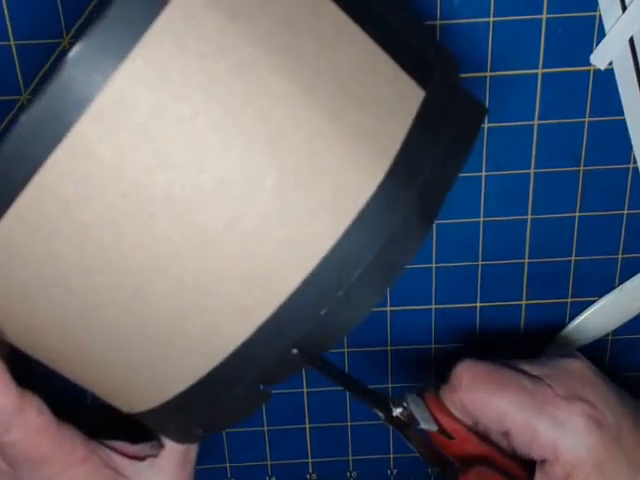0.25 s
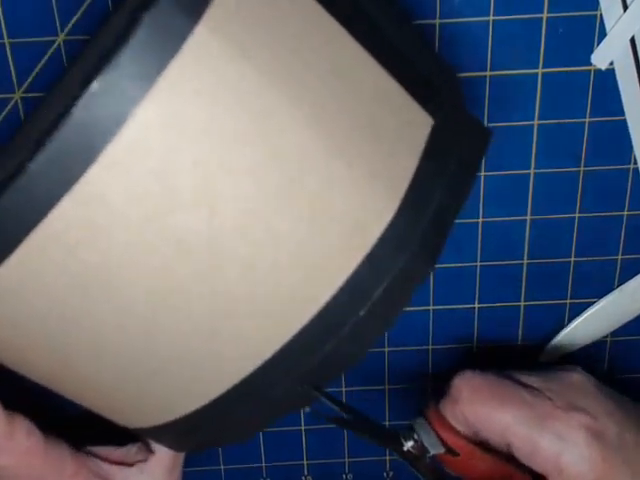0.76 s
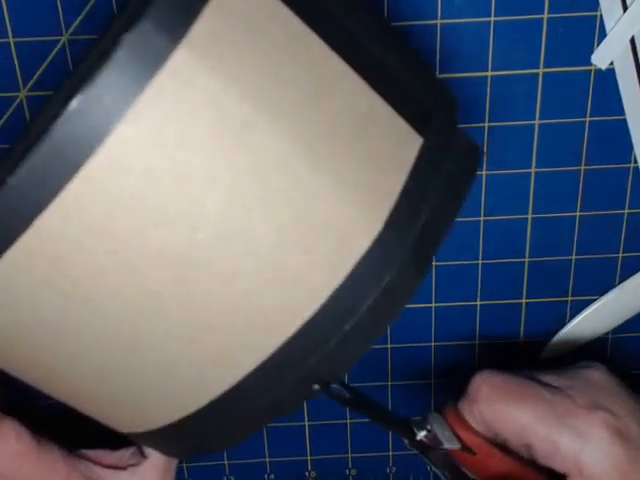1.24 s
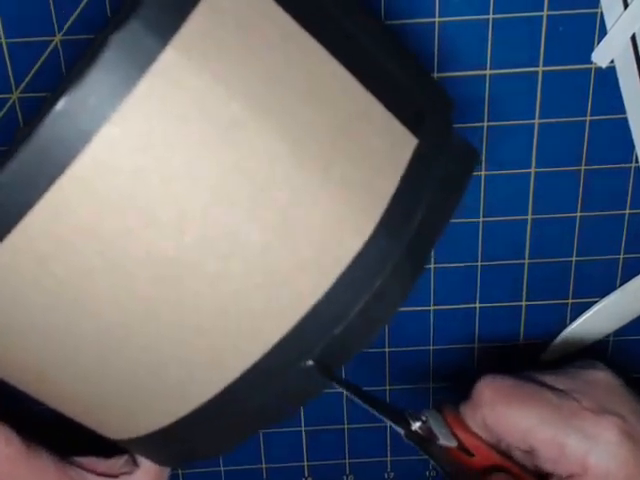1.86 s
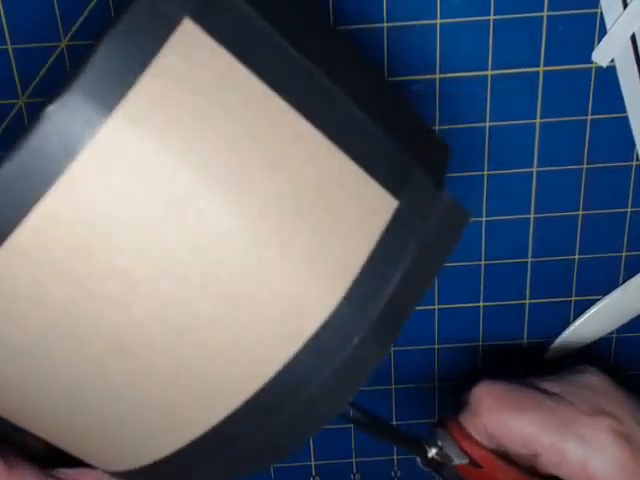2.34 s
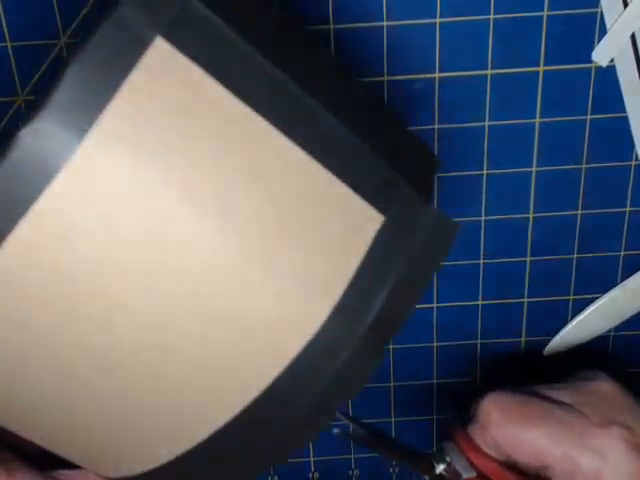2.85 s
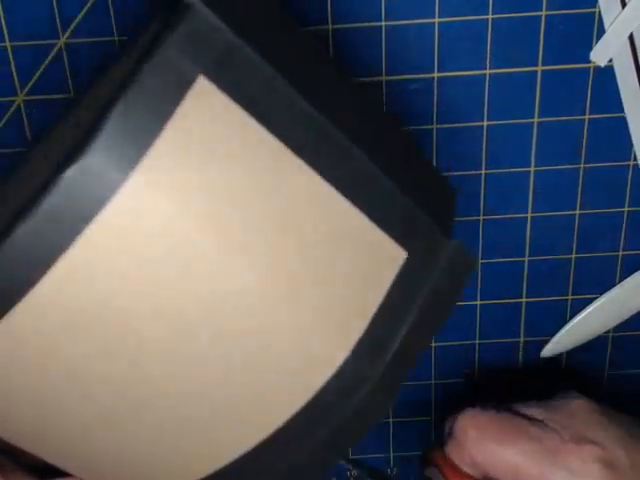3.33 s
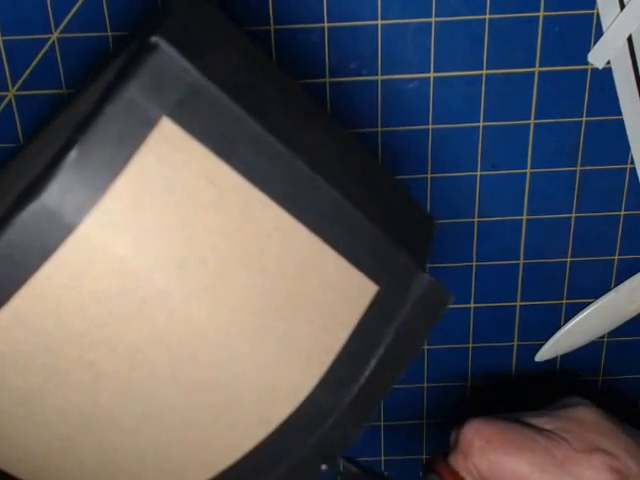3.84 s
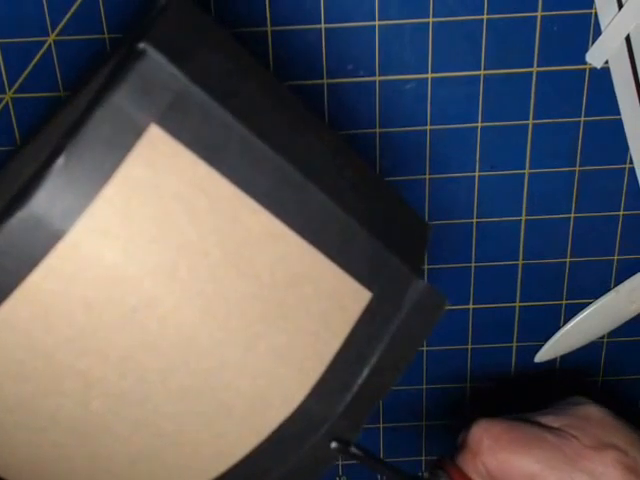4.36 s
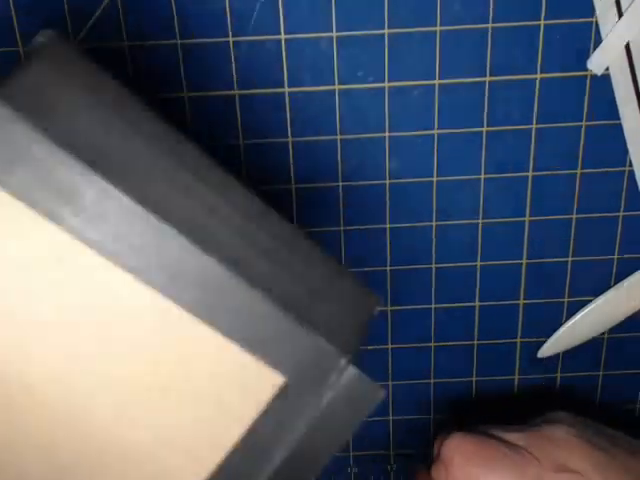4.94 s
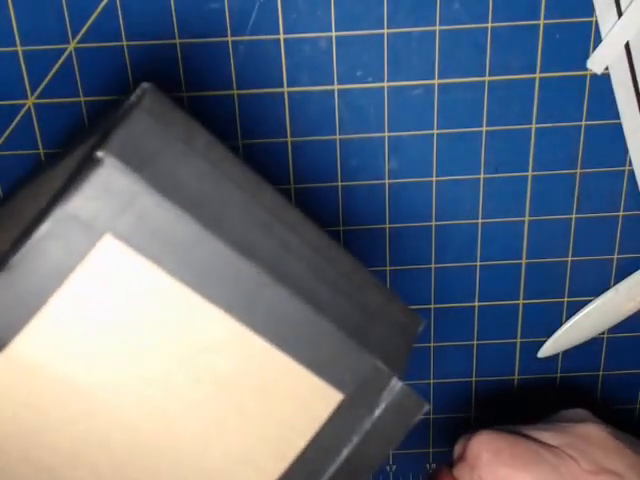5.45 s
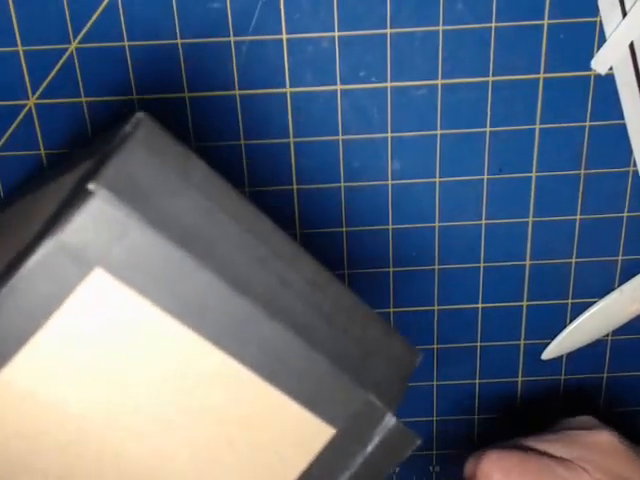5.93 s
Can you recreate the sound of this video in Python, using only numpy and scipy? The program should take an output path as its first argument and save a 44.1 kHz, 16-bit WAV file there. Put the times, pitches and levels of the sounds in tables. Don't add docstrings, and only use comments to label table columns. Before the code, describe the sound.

Close up in a quiet room with a faint hum, small steel scissors cut the taped rim of a hollow cardboard box. Taps and a dull knock come first, then five gritty shears, each ending in a bright metallic click, a boxy thump and a brief settling rustle. Between snips, fingers rub softly and tap the cardboard. The sound is dry, slightly dull on top, blades centred.

```python
import sys
import numpy as np
from scipy import signal
from scipy.fft import rfft, irfft
from scipy.io import wavfile
from scipy.ndimage import uniform_filter1d

SR = 44100
rng = np.random.default_rng(int(sys.argv[2]) if len(sys.argv) > 2 else 0)


def to_linear_factor(level_db):
    exponent = np.asarray(level_db, float) / 20
    return 10 ** exponent


def inscribe(sig):
    pcm = np.round(np.clip(np.atleast_2d(sig).T, -1, 1) * 32767)
    wavfile.write(sys.argv[1], SR, pcm.astype(np.int16))


N = 272977

SIDES = np.array([[1], [-1]])
BLADE_BOX_HZ, CLICK_TIPS_HZ = 1029, 6470
RUSTLE_SHEAR_HZ, DRAG_TIPS_HZ = 2400, 5460


def rms_one(x):
    return x / np.sqrt(np.mean(x ** 2) + 1e-20)


def at_hz(points, hz):
    points = np.array(points)
    return np.interp(np.log(hz), np.log(points[:, 0]), points[:, 1])


def band(x, low_hz, high_hz):
    return signal.sosfilt(signal.butter(3, [low_hz, high_hz], "band", fs=SR, output="sos"), x)


def drift(rate):
    r = np.exp(-80 * np.pi * rate / SR)
    slow = signal.lfilter([1], [1, -2 * r, r * r], rng.standard_normal(N // 40 + 2002))[2000:]
    return np.interp(np.arange(N) / 40, np.arange(len(slow)), rms_one(slow))


def resonate(x, hz, width_hz):
    r = np.exp(-np.pi * width_hz / SR)
    poles = [1, -2 * r * np.cos(2 * np.pi * hz / SR), r * r]
    return signal.lfilter([(1 - r * r) / 2, 0, (r * r - 1) / 2], poles, x + 1e-18)


def room_tone(side_db, swell_db):
    # frequency in Hz, level in dB per Hz
    room = [(40, -16), (60, -6), (90, -14.5), (170, 1), (500, -6), (900, -10), (1400, -15), (2000, -12),
            (2600, -14.5), (3200, -20), (4200, -18), (5300, -24), (5600, -37), (7000, -36.5)]
    # frequency in Hz, width in Hz, level in dB
    noise_bands = [(3650, 18, -89), (5100, 640, -88), (6380, 430, -91)]
    hz = np.arange(N // 2 + 1) * SR / N + 1
    mid, side, hiss = rng.standard_normal((3, N))
    tone = irfft(rfft(mid + to_linear_factor(side_db) * side * SIDES) * to_linear_factor(at_hz(room, hz)), N)
    faint_bands = sum(to_linear_factor(level_db + 4 * drift(6.5)) * rms_one(resonate(hiss, pitch_hz, width_hz))
                for pitch_hz, width_hz, level_db in noise_bands)
    return to_linear_factor(-66.5 + swell_db * drift(12)) * rms_one(tone) + faint_bands


def room_tail(x, apart):
    # frequency in Hz, time to fall 60 dB in seconds
    echo = [(100, 0.052), (500, 0.063), (2000, 0.14), (3500, .14), (4500, 0.033), (7000, 0.052)]
    t = np.arange(SR // 3) / SR
    shared, own = rng.standard_normal((2, len(t)))
    noise = shared + apart * own * SIDES
    octaves_hz = 80 * 2 ** np.arange(7)
    tail = sum(band(noise, low, low * 2) * to_linear_factor(-60 * t / at_hz(echo, low * 1.4)) for low in octaves_hz)
    tail = tail * np.clip(t / 0.01, 0, 1)
    tail = tail / np.sqrt(np.sum(tail ** 2) / 2)
    return signal.fftconvolve(x[None], tail, axes=1)[:, :N]


def pressure(rows, count, haste):
    sag_db_per_s, slip_s, slip_db = 91, .022, 6
    reach = SR // 6
    t, cracks = np.arange(-reach, reach) / SR, np.zeros(N)
    power, pitch = np.zeros((2, N + 2 * reach))
    times, levels_db, leads_hz = np.maximum(rows[:, :4], 1e-4), rows[:, 4 + count], rows[:, 7 + count]
    for (s, swell, hold, fade), level_db, hz in zip(times, levels_db, leads_hz):
        held = np.clip(t, 0, hold)
        shape_db = -20 * haste * (np.maximum(-t, 0) / swell + np.maximum(t - hold, 0) / fade)
        shape_db = shape_db - sag_db_per_s * held - slip_db * np.sin(np.pi * held / slip_s) ** 2
        at, touch = round(s * SR), to_linear_factor(level_db + shape_db) ** 2
        power[at:at + 2 * reach] += touch
        pitch[at:at + 2 * reach] += touch * hz
        cracks[at - 30] = to_linear_factor(level_db - 630 * swell)
    leading_hz = (pitch + 1e-14 * leads_hz.mean()) / (power + 1e-14)
    return np.sqrt(power[reach:reach + N]), cracks, leading_hz[reach:reach + N]


def body(modes, force, cracks, leading_hz, low_hz, high_hz, per_s, focus_db, wander_db, trim_db, crack_db):
    sizes = to_linear_factor(4.5 * np.minimum(rng.exponential(1, N), 3.5)) * rng.choice([-1, 1], N)
    grit = sizes * (rng.random(N) < per_s / SR)
    shares = []
    for k, (hz, width_hz, level_db) in enumerate(modes):
        away_db = focus_db * np.abs(np.log2(hz / leading_hz))
        share_db = level_db + np.clip(wander_db, 0, 4) * drift(14.9) - away_db
        shares.append((-1) ** k * to_linear_factor(share_db))
    total = np.sqrt(sum(share ** 2 * mode[1] for share, mode in zip(shares, modes)))
    rasp = sum(resonate(grit * share / total, *mode[:2]) for share, mode in zip(shares, modes))
    rasp = band(rasp, low_hz, high_hz)
    snap = sum(resonate(cracks * np.sign(share) * np.sqrt(np.abs(share) / total), *mode[:2])
               for share, mode in zip(shares, modes))
    rasp = rasp / np.sqrt(uniform_filter1d(rasp ** 2, size=350) + 0.05 * np.var(rasp))
    return to_linear_factor(trim_db) * rasp * force + to_linear_factor(crack_db) * band(snap, low_hz, high_hz)




def box_knocks():
    # peak in seconds, level in dB
    knocks = [(0.249, -69), (0.386, -58.5), (0.549, -41), (0.572, -32), (0.851, -43.5), (1.243, -48),
              (1.494, -56.5), (1.814, -41.5), (1.929, -49), (1.956, -38), (2.927, -44), (3.137, -32.5),
              (3.381, -33.5), (4.559, -60.5), (4.595, -31.5), (4.72, -52.5), (4.815, -56), (5.165, -40),
              (5.331, -54), (5.69, -55.5), (5.755, -31), (5.831, -49), (5.962, -33)]
    return np.array([(s, 0.012, 0, .038, *[db] * 3, *[225] * 3) for s, db in knocks])


def taps_on_box():
    # peak in seconds, box level in dB, blade level in dB, box mode in Hz
    taps = [(.251, -38.5, -59, 584), (.383, -39.5, -59.5, 549), (0.522, -35.5, -63.5, 665),
            (0.578, -28.5, -39, 610), (1.249, -49, -64.5, 438), (1.731, -35, -56, 668.8),
            (2.152, -43, -40.5, 1480), (2.629, -43, -63, 937), (2.915, -41.5, -63, 619),
            (2.929, -42, -59.5, 600), (3.064, -47, -62.5, 869), (3.101, -41.5, -42, 836),
            (5.163, -33.5, -58, 520), (5.831, -28, -44.5, 751.4)]
    return [(s, .005, 0, .02, db, blade, blade - 10.5, hz, 2199, 5500) for s, db, blade, hz in taps]


def skin_rubs():
    # start in seconds, length in seconds, box level in dB, box mode in Hz
    rubs = [(.109, 0.0033, -55.5, 518.3), (0.237, .024, -46.5, 583), (.416, .004, -57.5, 560),
            (0.984, .004, -58.5, 558.7), (1.256, .004, -51, 441), (1.354, .065, -46.5, 685),
            (1.495, 0.005, -69.5, 540), (1.548, .03, -64.5, 372.7), (2.77, .004, -66.5, 509.3),
            (2.94, 0.0015, -49, 569.5), (3.027, .004, -60.5, 699.7), (3.796, .052, -39, 760),
            (3.892, .031, -40.5, 739.7), (3.873, .004, -52, 690), (4.094, 0.021, -57.5, 661),
            (4.14, .004, -53.5, 697), (4.16, .02, -46.5, 697.5), (4.271, .004, -52.5, 596),
            (5.197, 0.0065, -49.5, 568.5), (5.225, .05, -46, 600.3), (5.328, .004, -46.5, 671.5),
            (5.544, 0.0052, -52, 720), (5.581, 0.0025, -43, 734.5), (5.658, .024, -48, 961)]
    return [(s, 0.013, hold, 0.029, db, db - 22, db - 40, hz, 2170, 5700) for s, hold, db, hz in rubs]


def blade_openings():
    # peak in seconds, blade level in dB, box level in dB, box mode in Hz
    openings = [
        (.71, -46.5, -48, 700),
        (3.297, -49, -48.5, 866),
        (3.828, -54, -46, 899.6),
        (3.91, -64, -54, 1100),
        (4.7, -44, -44, 1398),
        (5.908, -50.5, -45.5, 1450),
    ]
    return [(s, .034, 0, .03, db, blade, blade - 4.5, hz, 2297, 5500) for s, blade, db, hz in openings]


def faint_swells():
    # peak in seconds, level in dB
    swells = [
        (.82, -56.5),
        (1.913, -54.5),
        (3.275, -60.5),
        (3.345, -58),
        (5.93, -59),
    ]
    return [(s, .035, 0, 0.01, db - 6, db - 3, db, BLADE_BOX_HZ, RUSTLE_SHEAR_HZ, DRAG_TIPS_HZ)
            for s, db in swells]


def tape_strokes():
    # strongest pull in seconds, blade level in dB, box level in dB,
    # seconds to swell 20 dB, box mode in Hz
    strokes = [(.544, -44, -32, -0.0257, 650), (0.561, -28, -36, .028, 630),
               (1.783, -40, -41.5, -0.0227, 694.7), (1.808, -37.5, -40, 0.053, 681.4),
               (2.172, -48, -47, 0.03, 1480), (3.119, -33, -39, 0.0256, 830),
               (3.14, -31.5, -31.5, .03, 828), (3.694, -68.5, -70, 0.13, 599.7),
               (4.536, -45.5, -35.5, 0.03, 1100), (4.562, -44, -35, 0, 1000),
               (4.685, -54, -59.5, -0.97, 1300), (4.59, -27, -31, 0.02, 856),
               (4.715, -34.5, -39.5, -0.06, 1313), (5.691, -56, -36.5, -0.11, 993.5),
               (5.721, -44.5, -44, -0.02, 900), (5.741, -33, -35.5, 0, 1005),
               (5.757, -32, -30.5, 0.0263, 795), (5.846, -45.5, -40.5, 0.05, 755)]
    shortest_pull_s, at_rest_hz, hz_per_db = .012, 2200, 27.5
    return [(s, max(swell, shortest_pull_s), 0, .019, db, blade, blade - 4.5,
             hz, at_rest_hz + hz_per_db * (blade + 50), DRAG_TIPS_HZ) for s, blade, db, swell, hz in strokes]


def blade_ticks():
    # peak in seconds, box, shear and blade-tip levels in dB, shear mode in Hz
    ticks = [(0.838, -56, -42.5, -35, 4200), (1.926, -33.5, -29.5, -29.5, 2792),
             (1.938, -48, -36, -28.5, 2796), (1.962, -29.5, -29.5, -26, 2700),
             (3.366, -57.5, -46.5, -35.5, 4025), (1.815, -34.5, -32.5, -35, 2803),
             (4.592, -30.5, -25, -31.5, 3303), (4.717, -37.5, -27.5, -35.5, 2905),
             (5.76, -26.5, -28.5, -25.5, 2400), (4.79, -64.5, -53.5, -50, 4300),
             (4.801, -56, -39, -47, 4310), (5.951, -52, -49.5, -44.5, 4303),
             (5.96, -45.5, -31, -31.5, 3170)]
    return [(s, .0045, 0, .011, *levels, BLADE_BOX_HZ, hz, CLICK_TIPS_HZ) for s, *levels, hz in ticks]


def brief_tones():
    # start in seconds, length in seconds, level in dB, pitch in Hz
    tone_rows = [(.515, .013, -32, 650), (0.6, 0.014, -34, 640), (2.627, .013, -43, 940),
                 (4.524, 0.019, -32, 1254), (4.789, 0.026, -38.5, 4250), (4.788, 0.028, -40, 7050),
                 (5.899, 0.018, -36, 1500), (5.958, 0.0055, -20, 3090), (5.757, 0.013, -30, 478),
                 (1.729, .016, -37, 650), (.855, 0.063, -48.5, 1180), (0.87, .06, -50, 1880)]
    out, waver, rough = np.zeros(N), 1 + .007 * drift(44), to_linear_factor(4 * drift(120))
    for s, length, db, hz in tone_rows:
        at = np.arange(round(s * SR), round((s + length) * SR))
        envelope = np.sin(np.linspace(0, 1, len(at)) ** .75 * np.pi)
        tone = np.sin(2 * np.pi * hz * np.cumsum(waver[at]) / SR)
        out[at] += to_linear_factor(db) * rough[at] * envelope * tone
    return out


def snips():
    # slam in seconds, box, shear and blade-tip levels in dB, shear mode in Hz
    slams = [
        (.85, -24, -23, -17, 2700),
        (1.951, -25, -22, -26.5, 2720),
        (3.379, -27.5, -20.5, -17.5, 3020),
        (4.813, -24.5, -20, -22, 3380),
        (5.968, -23.5, -19, -18, 3130),
    ]
    # seconds after the slam, box, shear and tip levels in dB relative to it,
    # swell in seconds, fade in seconds
    rustle = (.03, -25.5, -23, -33.5, 0.07, 0.0437)
    lag, *less, swell, fade = rustle
    rows = []
    for s, *levels, hz in slams:
        rows += [(s, .003, 0, 0.0085, *levels, BLADE_BOX_HZ, hz, CLICK_TIPS_HZ),
                 (s + lag, swell, 0, fade, *np.add(levels, less), BLADE_BOX_HZ, RUSTLE_SHEAR_HZ, DRAG_TIPS_HZ)]
    return rows


def scene():
    # frequency in Hz, width in Hz, level in dB
    thud_modes = [(71.6, 43, -22.5), (140, 60, -6.5), (230, 45, 2), (306, 90, -8)]
    box_modes = [(306, 120, -8), (424, 110, 2), (636, 140, 3), (794, 160, 0), (863, 120, 0.5),
                 (1185, 100, -1.5), (1450, 200, -3)]
    shear_modes = [(1880, 200, 2.15), (2385, 170, 0), (2887, 300, -1.9), (3260, 300, 0), (3610, 350, -3.5),
                   (4254, 340, -4)]
    tip_modes = [(4953, 610, -4.5), (5560, 150, -1.5), (6120, 150, -3.5), (6580, 130, 0.5),
                 (7330, 880, -0.5)]
    touches = np.array(taps_on_box() + skin_rubs() + tape_strokes() + blade_ticks() + snips()
                       + blade_openings() + faint_swells())
    knocking = pressure(box_knocks(), count=0, haste=0.87)
    on_box = pressure(touches, count=0, haste=1.013)
    shearing = pressure(touches, count=1, haste=1.24)
    on_tips = pressure(touches, count=2, haste=1.32)
    thud = body(thud_modes, *knocking, 80, 370, per_s=2800, focus_db=-0.5, wander_db=2.5,
                trim_db=-6, crack_db=42.5)
    box = body(box_modes, *on_box, 200, 1800, per_s=4000, focus_db=12, wander_db=4.5,
               trim_db=1.4, crack_db=45.5)
    shear = body(shear_modes, *shearing, 1500, 4800, per_s=1800, focus_db=9, wander_db=5,
                 trim_db=1.5, crack_db=42)
    tips = body(tip_modes, *on_tips, 3300, 8500, per_s=2600, focus_db=15.5, wander_db=5,
                trim_db=2.5, crack_db=44.5)
    tips = tips + brief_tones()
    near = thud * to_linear_factor(-1.4 * SIDES) + box * to_linear_factor(.55 * SIDES) + shear + tips
    far = to_linear_factor(-20.5) * room_tail(thud + box + shear + tips, apart=0.72)
    return near + far + room_tone(side_db=-15, swell_db=1.5)


def thin_out(x, left_db, side_left_db, side_top_hz):
    # frequency in Hz, level in dB
    kept_above = [(40, -84), (90, -84), (150, -92), (900, -91), (2500, -90.5), (5300, -91.5), (5450, -110),
                  (7500, -120)]
    hz, _, frames = signal.stft([x[0] + x[1], x[0] - x[1]], SR, nperseg=4096)
    limit_db = at_hz(kept_above, hz + 1)
    limit = to_linear_factor(np.array([limit_db, np.maximum(limit_db, -93)]))[:, :, None]
    filler_db = np.where((hz > 900) & (hz < side_top_hz), side_left_db, left_db)
    left = to_linear_factor(np.array([left_db + 0 * hz, filler_db]))[:, :, None]
    kept = np.minimum((np.abs(frames) / limit) ** 8, 1)
    thinned = frames * (kept + left * (1 - kept))
    both, apart = signal.istft(thinned, SR, nperseg=4096)[1][:, :N]
    return (both + apart * SIDES) / 2


def low_pass(x):
    return signal.sosfilt(signal.butter(12, 8510, fs=SR, output="sos"), x)


def record(dry):
    thinned = thin_out(dry, left_db=-25, side_left_db=-7.5, side_top_hz=4100)
    step = signal.sosfilt(signal.cheby2(10, 19, 7300, fs=SR, output="sos"), thinned)
    mix = signal.sosfilt(signal.cheby2(8, 45, 9400, fs=SR, output="sos"), step)
    return low_pass(mix)


dry = scene()
out = record(dry)
inscribe(out)
```